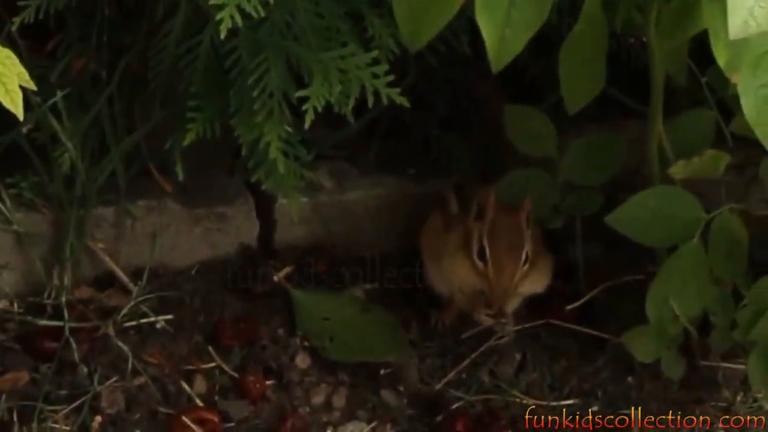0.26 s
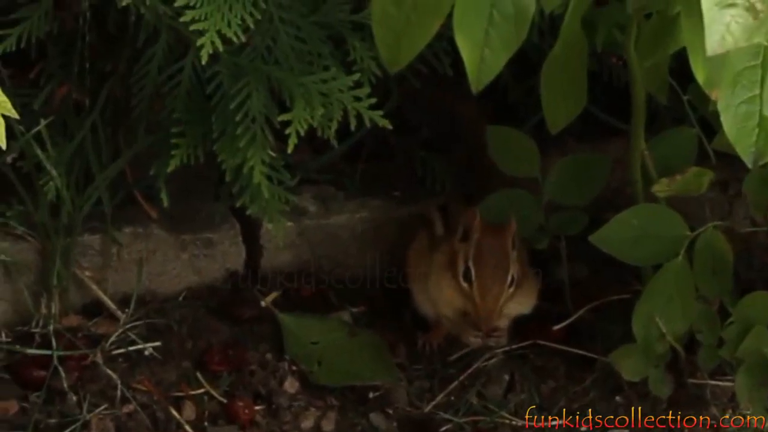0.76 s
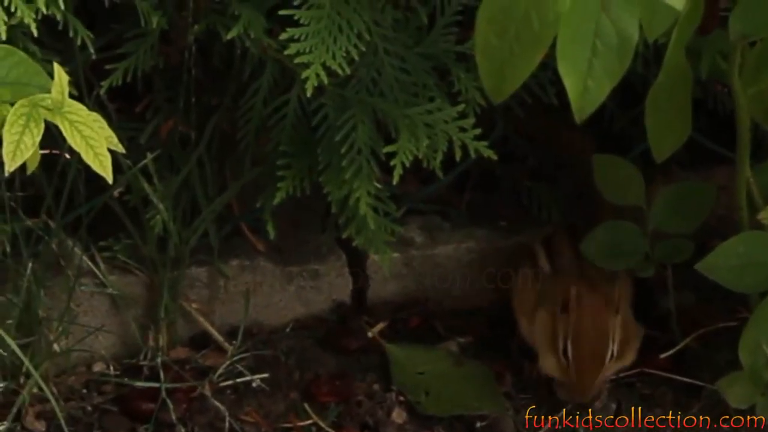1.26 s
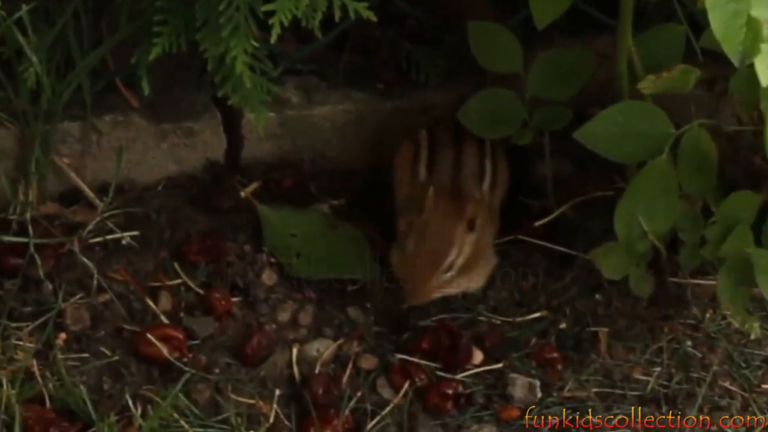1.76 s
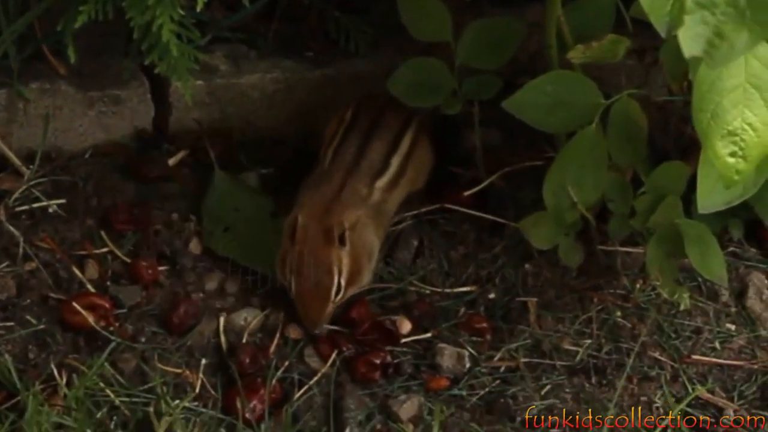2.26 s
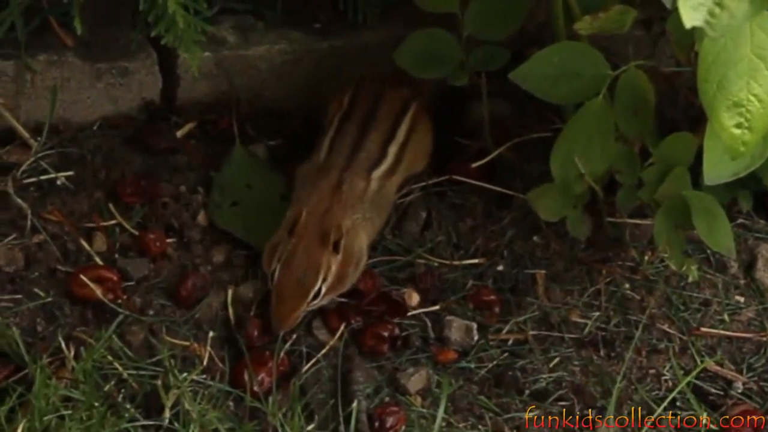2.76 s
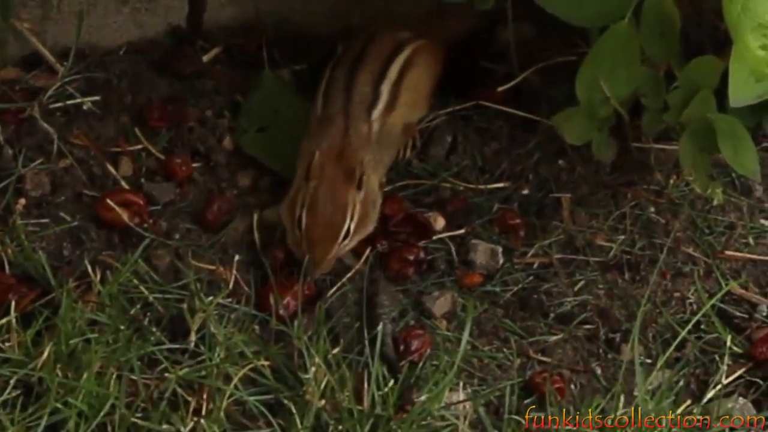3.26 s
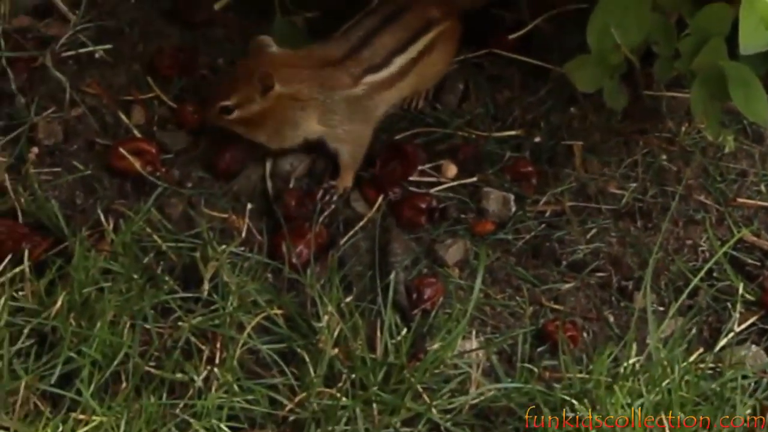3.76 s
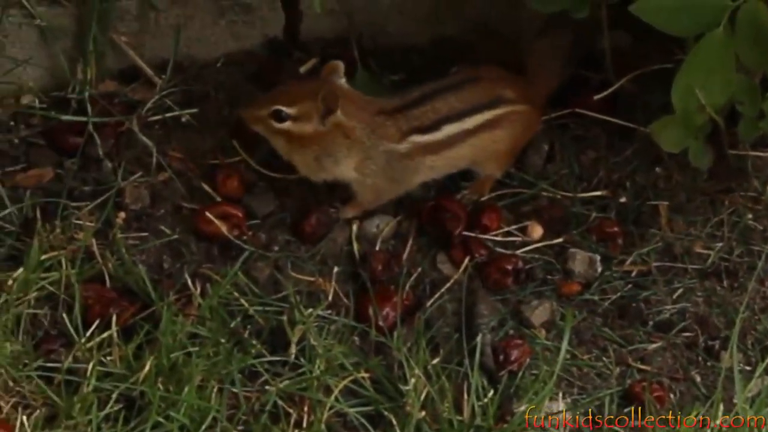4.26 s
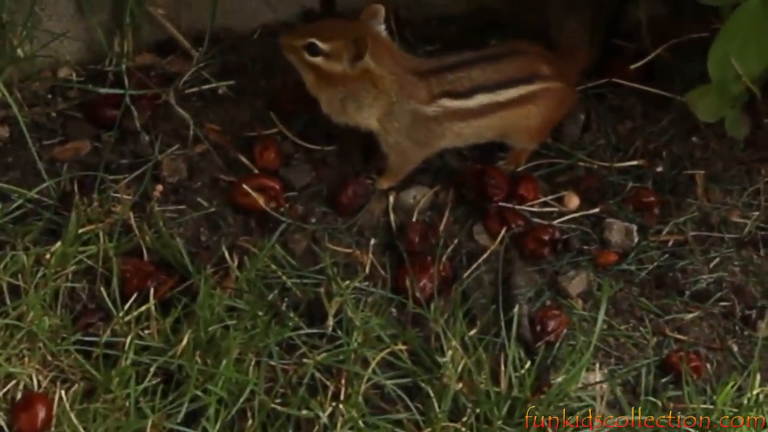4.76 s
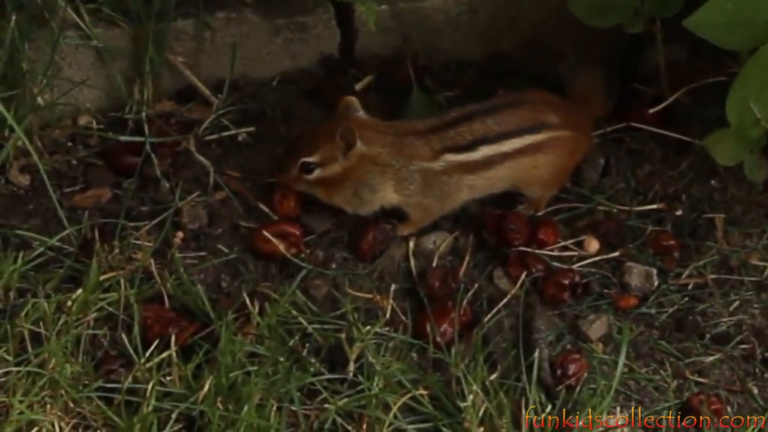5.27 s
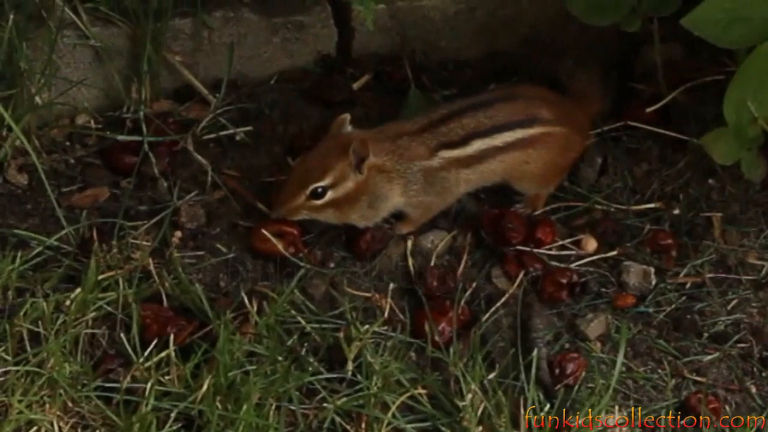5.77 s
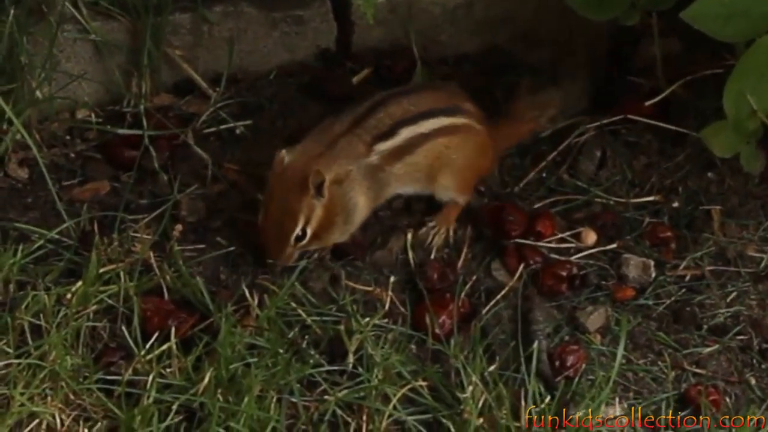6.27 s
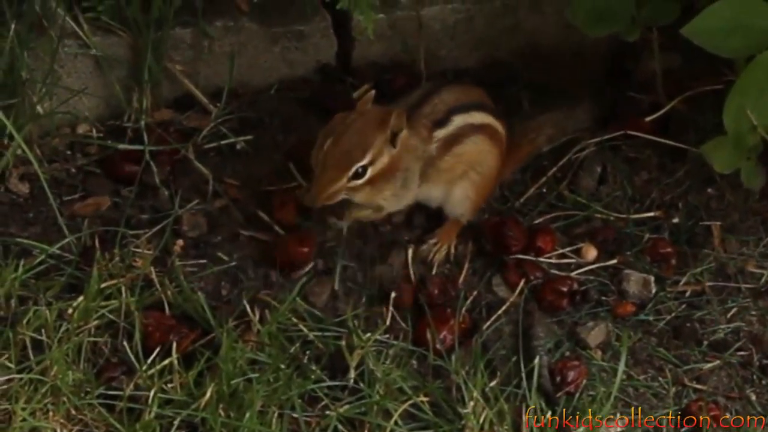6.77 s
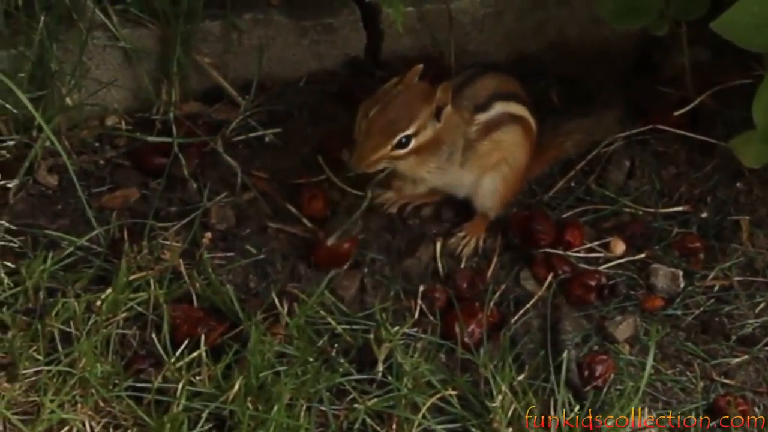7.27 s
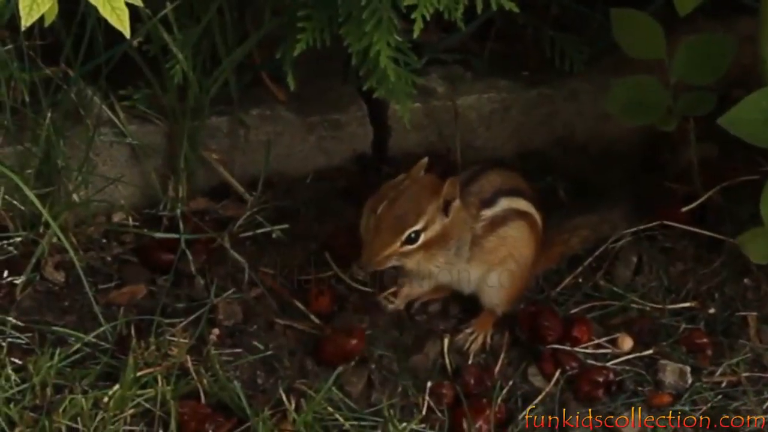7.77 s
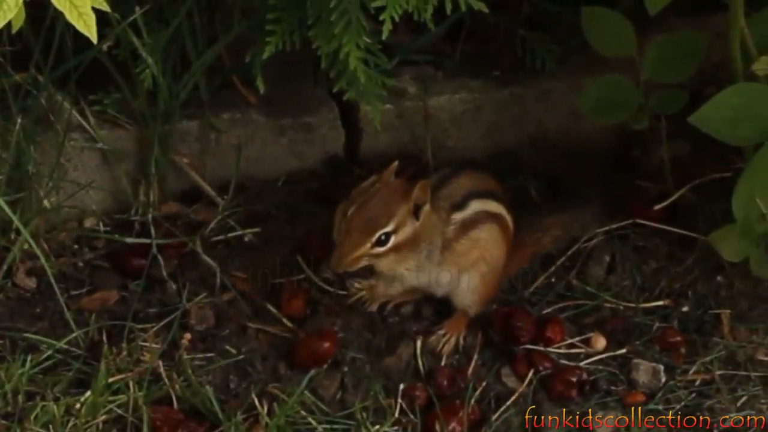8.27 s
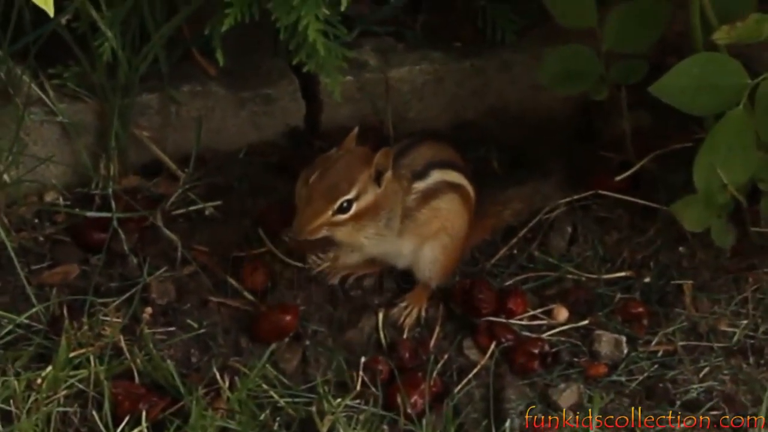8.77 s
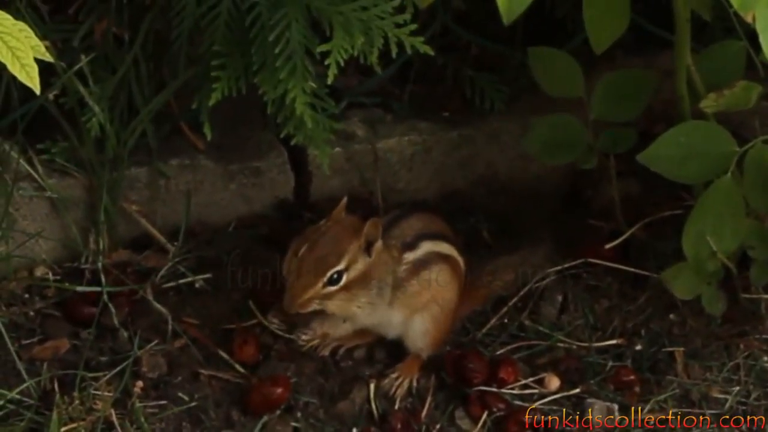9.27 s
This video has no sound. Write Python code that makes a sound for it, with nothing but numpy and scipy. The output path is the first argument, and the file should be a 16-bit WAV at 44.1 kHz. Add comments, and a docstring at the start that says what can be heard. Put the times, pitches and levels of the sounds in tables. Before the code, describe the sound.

A chipmunk repeats short, high chips at an even pace over hissing leaves and a faint distant town drone.

```python
"""First come a distant town drone, a machine hum and hissing leaves, the steady sound of a backyard.
Almost at once a chipmunk some metres away starts repeating its chip, a whistle that arches up and
drops steeply. Leaves and a wall scatter each chip, and a second caller chips from far off.
A few soft thuds sound, a broader hiss comes in for three seconds, and later four tiny peeps
fall between the chips."""
import sys
import numpy as np
from scipy import signal
from scipy.fft import rfft, irfft
from scipy.io import wavfile
from scipy.ndimage import uniform_filter1d

SR = 44100
rng = np.random.default_rng(int(sys.argv[2]) if len(sys.argv) > 2 else 0)


def master_out(mix):
    """Clip the mix to full scale and print it as 16-bit PCM to the path in sys.argv[1]."""
    frames = np.transpose(np.atleast_2d(mix))
    ceiling = np.clip(frames, -1, 1)
    pcm = np.round(ceiling * 32767).astype(np.int16)
    wavfile.write(sys.argv[1], SR, pcm)


N = 419391
T = np.arange(N) / SR


def undb(db):
    """Turn decibels into a number to multiply a sound by."""
    return 10 ** (np.asarray(db) / 20)


def pan(db):
    """Left and right gains that make the left side db louder than the right."""
    return undb(np.array([[db], [-db]]) / 2)


def add(out, start_s, sound):
    """Mix a stereo sound in at its start time."""
    i = max(int(start_s * SR), 0)
    out[:, i:i + sound.shape[1]] += sound[:, :max(N - i, 0)]


def wander(rate_hz, size=N):
    """A smooth random wobble, typically about 1 either side of zero."""
    hold = max(int(SR / rate_hz), 1)
    steps = np.repeat(rng.standard_normal(size // hold + 2), hold)
    return 1.248 * uniform_filter1d(uniform_filter1d(steps, hold), hold)[:size]


def noise(spectrum, likeness, flicker_db):
    """Noise shaped by (pitch_hz, level_db) points; likeness is how alike the two sides are."""
    hz, db = np.transpose(spectrum)
    octave = np.log2(np.maximum(np.fft.rfftfreq(N, 1 / SR), 1))
    mid, side = rfft(rng.standard_normal((2, N))) * undb(np.interp(octave, np.log2(hz), db))
    stereo = np.sqrt(1 + likeness) * mid + np.sqrt(1 - likeness) * side * np.array([[1], [-1]])
    out = 0
    for centre in range(4, 16, 2):  # each band, low to high, flickers on its own
        band = irfft(stereo * np.maximum(1 - abs(octave - centre) / 2, 0), N)
        out = out + band * undb(flicker_db * wander(6))
    return out / np.sqrt(np.mean(out ** 2))


# How strong the town's drone is from low to high: pitch_hz, relative_db
DRONE_SPECTRUM = [(40, -35.5), (125, -41), (150, -18.5), (172, -7.5), (205, -6), (270, -6.5), (330, -4),
                  (420, -3.5), (560, -5), (820, -5), (1000, -9.5), (1180, -15.5), (1400, -26), (2200, -62)]
# How the tyre noise rises and falls: time_s, relative_db
TYRE_LEVELS = [(0.0, -53.5), (2.49, -58), (4.07, -60), (4.34, -76), (6.22, -69.5), (6.35, -66.5),
               (8.57, -57.5), (9.5, -56)]

def town():
    """Distant traffic and machinery: a wash of tyres over a drone that follows it a little."""
    traffic_db = np.interp(T, *np.transpose(TYRE_LEVELS))
    drone_db = -46.5 + 0.12 * (traffic_db - traffic_db.mean())
    drone = noise(DRONE_SPECTRUM, likeness=-0.089, flicker_db=0.9) * undb(drone_db)
    tyre_spectrum = [(400, -42), (900, -6), (1250, 2), (1600, -9.5), (2200, -22.5), (3500, -50.5)]
    tyres = noise(tyre_spectrum, likeness=0.02, flicker_db=0.5) * undb(traffic_db + 1.5)
    return pan(1.86) * (drone + tyres)


# Moments when the low rumble swells: start_s, length_s, level_db
RUMBLE_SWELLS = [(0, 4.2, -68.3), (7.796, 0.15, -66), (8.995, .25, -71.5)]

def town_rumble():
    """A faint rumble and the low tone of mains electricity swell and sink back together."""
    rest_db, rise_s, fade_s, mains_hz = -78, .04, 0.0704, 118.6
    gain = undb(rest_db)
    for start_s, length_s, level_db in RUMBLE_SWELLS:
        rise = np.clip((T - start_s) / rise_s, 0, 1)
        fade = np.exp(-np.maximum(T - start_s - length_s, 0) / fade_s)
        gain = np.hypot(gain, undb(level_db) * rise * fade)
    spectrum = [(20, -4.5), (70, -1), (130, -3), (200, 1), (500, -61.5), (2000, -93)]
    rumble = noise(spectrum, likeness=.1, flicker_db=5)
    mains = undb(-3.5 + 2 * wander(2.9)) * np.sin(2 * np.pi * mains_hz * T + .5 * wander(4.6))
    return pan(-3) * (rumble + mains) * gain


# The tones of the machine: pitch_hz, level_db, left_minus_right_db
HUM_TONES = [(234.4, -64.5, -15), (296.4, -68, 0), (486, -65, 1.5), (1000, -66.5, 7.5)]

def machine_hum():
    """A far machine whose tones waver on their way to each ear."""
    out = np.zeros((2, N))
    for pitch_hz, level_db, pan_db in HUM_TONES:
        for ear in range(2):
            phase = 2 * np.pi * pitch_hz * T + 0.86 * wander(5)
            gain = pan(pan_db)[ear] * undb(level_db + 0.83 * wander(4))
            out[ear] += gain * np.sqrt(2) * np.sin(phase)
    return out


# How strong the fine leaf hiss is from low to high: pitch_hz, relative_db
FINE_LEAF_SPECTRUM = [(2000, -19), (3200, -23), (3900, 0), (4550, 2.5), (5100, 1.5), (5600, 1.5),
                      (6200, -11.5), (7000, -25), (8000, -34), (10000, -39), (15500, -49)]
# How the breeze rises and falls: time_s, strength_db
BREEZE_STRENGTH = [(0, 1.5), (1.7, 3.5), (4.4, -1), (5.0, -0.2), (5.6, -3.5), (6.3, -4), (6.7, -1),
                   (7.05, -2), (7.75, -0.5), (9.5, 1.3)]

def leaves():
    """Leaves hiss in the breeze over a faint even hiss; the lower and brightest parts swing most."""
    breeze_db = np.interp(T, *np.transpose(BREEZE_STRENGTH))
    lower_spectrum = [(1200, -25), (2300, -13), (2900, -9), (3450, 1), (4000, -3.5), (5000, -19),
                      (7000, -18.5), (10000, -30), (15000, -47)]
    bright_spectrum = [(4500, -23), (5900, 4), (6700, 1), (7400, -10), (8200, -22), (12000, -39)]
    fine = noise(FINE_LEAF_SPECTRUM, likeness=-0.33, flicker_db=1.3) * undb(-51.5 + breeze_db)
    lower = noise(lower_spectrum, likeness=0.047, flicker_db=1.1) * undb(-57.5 + 2.57 * breeze_db)
    bright = noise(bright_spectrum, likeness=0, flicker_db=0.5) * undb(-65.5 + 1.85 * breeze_db)
    even = noise([(1000, 2), (8000, 0.82), (15500, -1)], likeness=0.02, flicker_db=1.7) * undb(-71.5)
    return fine + lower + bright + even


def whistle(shape, shift_hz, top_db, drop_db, roughness):
    """A nearly pure tone that arches up and down, with a fast tremble in pitch and loudness."""
    time_s, pitch_hz, level_db = np.transpose(shape)
    t = np.arange(SR // 10) / SR
    arch_hz = np.interp(t, time_s, pitch_hz)
    # the top of the arch and its low end can each be voiced louder or softer
    accent_db = np.interp(arch_hz, [3100, 3600, 4000, 4400], [drop_db, 0, 0, top_db])
    gain = undb(np.interp(t, time_s, level_db) + accent_db + 2 * wander(500, size=len(t)))
    edge_fade = np.clip(np.minimum(t, time_s[-1] - t) / .002, 0, 1)
    trembling_hz = (arch_hz + shift_hz) * (1 + roughness * wander(900, size=len(t)))
    return edge_fade * gain * np.sin(2 * np.pi * np.cumsum(trembling_hz) / SR)


def echoes(delay_s, rise_s, fade_s):
    """Many tiny echoes that build up, then die away by 60 dB over fade_s."""
    t = np.maximum(np.arange(SR) / SR - delay_s, 0)
    shape = (1 - np.exp(-t / rise_s)) * np.exp(-np.log(1000) * t / fade_s)
    return rng.standard_normal((2, SR)) * shape / np.sqrt(np.sum(shape ** 2))


def reflect(sound, pattern):
    """Send a mono sound through a stereo pattern of echoes."""
    return signal.fftconvolve(sound[None], pattern, axes=1)


# The path of one far whistle: time_s, pitch_hz, relative_db
FAR_CHIP_SHAPE = [(0, 4270, 6), (.012, 4900, -0.5), (.03, 4370, -5.5), (.05, 3950, -1.5), (.065, 3500, 3.5)]
# Each far call: start_s, relative_db, pitch_shift_hz
FAR_CALLS = [(.085, -48, 503), (.29, -43.5, -4), (.71, -48.5, 603), (2.659, -44.5, 0), (3.629, -47, -3),
             (4.744, -42.5, 3), (5.714, -43, -4), (7.12, -44.5, 1), (8.052, -46, 394), (8.29, -44.5, -1),
             (8.655, -48, 400), (9.251, -48, 395), (9.47, -43.5, 202)]

def far_caller():
    """Higher chips that arrive only as a smear through the trees."""
    out = np.zeros((2, N))
    boost_db = 4.5
    for start_s, relative_db, shift_hz in FAR_CALLS:
        call = whistle(FAR_CHIP_SHAPE, shift_hz, top_db=0, drop_db=0, roughness=.075)
        trees = echoes(delay_s=0, rise_s=0.0085, fade_s=0.72)
        add(out, start_s, undb(relative_db + boost_db) * reflect(call, trees))
    return out


def yard(call, pan_db, scatter_db):
    """A call arrives directly and by one close bounce; leaves, a wall and trees add echoes."""
    foliage = undb(-3) * echoes(delay_s=.006, rise_s=.002, fade_s=.15)
    wall = undb(-10) * echoes(delay_s=.052, rise_s=.001, fade_s=.06)
    trees = undb(-8) * echoes(delay_s=.025, rise_s=.017, fade_s=.79)
    scattered = reflect(call, undb(scatter_db) * (foliage + wall + trees))
    paths = np.zeros((2, SR))
    lag = int(np.clip(3 * pan_db, -17, 17))
    arrival = np.array([max(-lag, 0), max(lag, 0)])  # the louder side hears it first
    paths[[0, 1], arrival] = pan(pan_db)[:, 0]
    bounce = int(.007 * SR) + rng.integers(0, 12, size=2)
    paths[[0, 1], arrival + bounce] = undb(-3) * pan(pan_db)[:, 0]
    # sound skimming the ground mixes with its reflection, favouring the middle of the arch
    skimmed = signal.lfilter(*signal.iirpeak(3850, 4.2, fs=SR), call)
    return reflect(skimmed, paths) + scattered


# The path of one near whistle: time_s, pitch_hz, relative_db
CHIP_SHAPE = [(0, 3280, -12.5), (.008, 3920, -8), (.019, 4560, -10), (.024, 4350, -11), (.028, 3855, 2.5),
              (.034, 3760, -2.5), (.038, 3110, -9), (.046, 3000, -9.5), (.057, 2490, -26.5)]
# Each near call: start_s, direct_db, left_minus_right_db, top_accent_db, drop_accent_db
CHIP_CALLS = [(.12, -24, .5, 1, 6.5), (0.735, -26, 0.5, 3, 7.5), (1.639, -26.5, 11, 4, 3),
              (2.37, -24.5, 8, 1, 0), (2.932, -24, 11, 2, 0), (3.409, -23.5, 11.5, -2, 0.5),
              (4.003, -24.5, 11.5, 0, -1), (4.572, -25, 4, 0.5, 1), (5.194, -27.5, 4, 8, 2),
              (5.783, -26.5, -0.5, 1, 2.5), (6.428, -27.5, 0, -2.5, -1.5), (7.177, -28, -1, -0.5, 1.5),
              (8.076, -31, -4, -1, 3.5), (8.679, -27.5, -4, 3, 2), (9.282, -28, -4, 1, 3)]

def chipmunk():
    """The main caller: the same arch each time, heard more or less directly, from changing sides."""
    out = np.zeros((2, N))
    echo_db = -25  # the yard scatters every chip equally, however shaded the direct path is
    for start_s, direct_db, pan_db, top_db, drop_db in CHIP_CALLS:
        call = whistle(CHIP_SHAPE, 0, top_db, drop_db, roughness=.033)
        add(out, start_s, undb(direct_db) * yard(call, pan_db, echo_db - direct_db))
    return out


# Each thud: middle_s, pitch_hz, level_db, half_length_s
LOW_THUDS = [(0.386, 175, -41, 0.012), (1.785, 170, -53, 0.033), (4.94, 340, -52, 0.035),
             (8.996, 175, -59, 0.022)]

def thuds():
    """Soft, rounded thuds, each a low tone that briefly swells and fades."""
    out = np.zeros((2, N))
    for middle_s, pitch_hz, level_db, half_length_s in LOW_THUDS:
        swell = np.exp(-((T - middle_s) / half_length_s) ** 2)
        out += undb(level_db) * swell * np.sin(2 * np.pi * pitch_hz * T)
    return out


# How strong the broad hiss is from low to high: pitch_hz, relative_db
HISS_SPECTRUM = [(30, -19), (100, 1.5), (250, -6.5), (700, -6), (1300, 0.5), (2000, 0.5), (3200, 4.5),
                 (4500, -1), (6000, -7), (8000, -8.5), (11000, -14.5), (15500, -17)]

def broad_hiss():
    """A wide hiss starts suddenly, sags a little for three seconds, then fades fast."""
    start_s, fade_start_s = 1.19, 4.19
    sag_db_per_s, fade_db_per_s = 0.77, 81
    level_db = -42.5 - sag_db_per_s * (T - start_s) - fade_db_per_s * np.maximum(T - fade_start_s, 0)
    return noise(HISS_SPECTRUM, likeness=0.02, flicker_db=.9) * undb(level_db) * (T > start_s)


# The path of one peep: time_s, pitch_hz, relative_db
PEEP_SHAPE = [(0, 3235, -15), (.004, 3730, -5), (.009, 4236, 0.5), (.014, 3670, -9.5), (.018, 3270, -7.5),
              (.021, 2680, -14)]
# Each peep: start_s, level_db
PEEP_CALLS = [(4.973, -35), (5.080, -33), (6.614, -39), (6.736, -43.5)]

def peeps():
    """Pairs of very short, soft, scratchy whistles that echo in the yard."""
    out = np.zeros((2, N))
    for start_s, level_db in PEEP_CALLS:
        note = whistle(PEEP_SHAPE, 0, top_db=-1, drop_db=9, roughness=0.06)
        add(out, start_s, undb(level_db) * yard(note, pan_db=0, scatter_db=0))
    return out


def scene():
    """The calls, thuds and broad hiss over the backyard's steady sound."""
    calls = chipmunk() + peeps() + far_caller()
    background = town() + town_rumble() + machine_hum() + leaves()
    return calls + background + thuds() + broad_hiss()


def record(dry):
    """A steep filter cuts off the very highest treble."""
    top_hz = 15750
    return signal.sosfilt(signal.ellip(12, .1, 70, top_hz, fs=SR, output="sos"), dry)


dry = scene()
out = record(dry)
master_out(out)
```